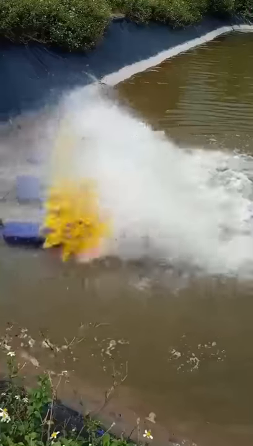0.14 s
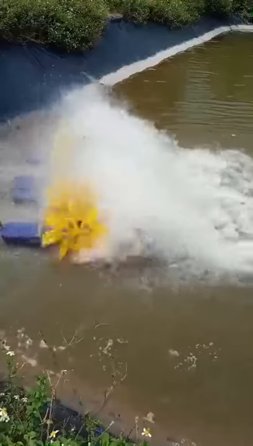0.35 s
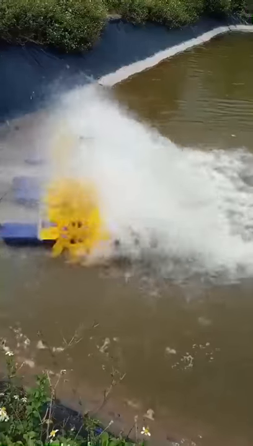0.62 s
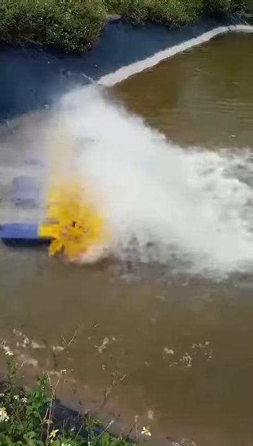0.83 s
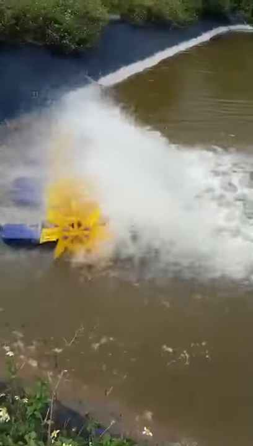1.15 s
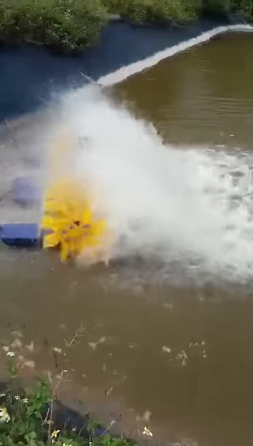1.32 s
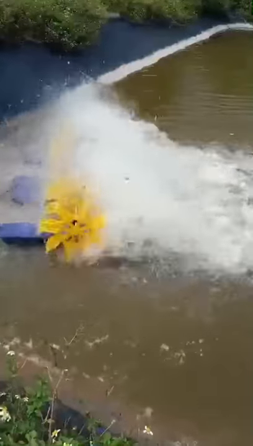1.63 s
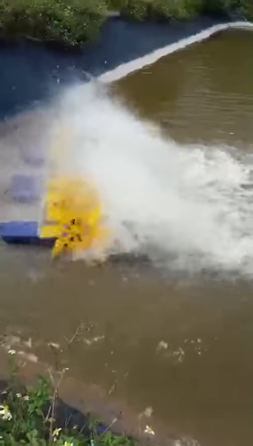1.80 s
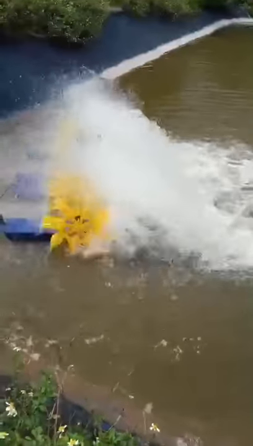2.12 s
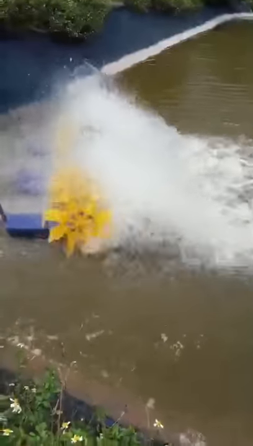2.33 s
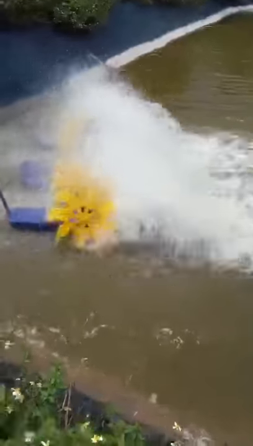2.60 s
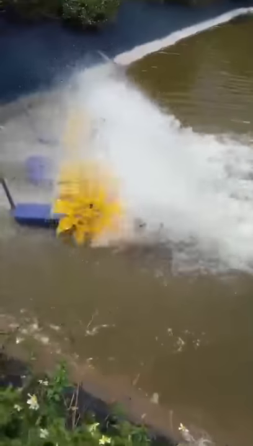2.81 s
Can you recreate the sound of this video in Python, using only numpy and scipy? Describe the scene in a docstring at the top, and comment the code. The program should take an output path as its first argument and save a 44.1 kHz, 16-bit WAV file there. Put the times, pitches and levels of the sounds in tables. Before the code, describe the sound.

Steady splashing and hissing spray from a paddle wheel aerator, its motor humming faintly.

```python
"""Paddle wheel churning a pond

A paddle wheel aerator turns a few metres away, heard in mono and fading in. Its blades slap
the water and drag air under, which booms. Torn sheets of water fall back as a dense rush of
bubbles, heavy lumps land with a plop, and fine spray hisses on top. Beneath the water noise
the motor hums and its gearbox whines."""
import sys
import numpy as np
from scipy import signal
from scipy.fft import rfft, irfft, next_fast_len
from scipy.io import wavfile

SR = 44100
rng = np.random.default_rng(int(sys.argv[2]) if len(sys.argv) > 2 else 0)


def store_pcm(level_fs):
    """Save levels as 16-bit WAV."""
    pcm = np.round(np.clip(level_fs, -1, 1) * 32767).astype(np.int16)
    wavfile.write(sys.argv[1], SR, np.atleast_2d(pcm).T)


N = 130095
TIME = np.arange(N) / SR
CUTOFF_HZ = 10500  # the treble ends here

# The tones of the motor's hum. Each row: pitch in Hz, average level in dB.
HUM_TONES = [(129, -58.5), (169, -59), (318, -54.5), (726.5, -54), (1680, -60)]
# How the gear whine comes and goes. Each row: time in seconds, level in dB against the other rows.
WHINE_CURVE = [(.13, -39.5), (.42, -43.5), (.55, -39.5), (.73, -40.5), (.84, -45.5), (1.1, -41),
               (1.45, -54), (1.65, -38), (1.9, -48), (2.2, -40.5), (2.5, -40.5), (2.7, -42), (2.95, -57)]
# The tone colour of falling spray. Each row: frequency in Hz, relative strength in dB.
SPRAY_SPECTRUM = [(1500, -23), (3300, -3.5), (3650, -2), (4500, -3.5), (5450, -2), (5850, -1), (6400, -1.5),
                  (7200, 2.5), (7650, -0.5), (9300, 2), (9750, -9), (10000, -6.5), (10200, -20),
                  (10500, -30)]
# How the spray swells and sinks. Each row: time in seconds, level change in dB.
SPRAY_CURVE = [(.13, -0.5), (.25, 0.5), (.48, 1.1), (.62, 0), (.7, 0), (.9, .9), (1.3, .5), (1.75, 0.6),
               (1.86, -1.1), (1.95, 0.3), (2.3, 0.5), (2.6, -.5), (2.75, 1.5), (2.95, -0.1)]
# The tone colour of churned water. Each row: frequency in Hz, relative strength in dB.
CHURN_SPECTRUM = [(20, -36), (42, -32), (62, -23.5), (95, -13), (128, -9), (200, -6.6), (380, -7),
                  (530, -6.5), (680, -2), (1000, -3), (1280, -4.5), (1550, -6.5), (1950, 0.5), (2150, -1.5),
                  (2550, -1.5), (2900, -10), (3350, -18.5), (5000, -21.5), (10000, -43)]
# How much water the wheel throws. Each row: time in seconds, change in dB.
THROW_CURVE = [(.13, 0.1), (.4, -0.5), (.62, 0.5), (.84, -0.24), (1.15, 0.06), (1.4, 0.25), (1.54, -0.8),
               (1.68, 0), (1.95, -0.2), (2.2, 0.04), (2.5, 0.25), (2.95, 0.3)]
# How the water's bright roar swells and sinks. Each row: time in seconds, level change in dB.
ROAR_CURVE = [(.15, -1), (.32, 0), (.45, .5), (.68, .5), (.8, -2), (.92, 1), (1.13, 0.3), (1.4, 1.1),
              (1.49, -0.5), (1.68, 1.5), (1.87, -0.9), (2.0, 0.5), (2.12, -0.4), (2.5, 0.1), (2.7, 1.3),
              (2.95, -0.5)]
# How the hiss just above that roar swells and sinks. Each row: time in seconds, level change in dB.
HISS_CURVE = [(.13, 0), (.5, 1), (.74, 0.3), (.9, 0.3), (1.22, 0.7), (1.48, 0), (1.6, 1.3), (1.73, -0.5),
              (1.97, -0.5), (2.05, -3.5), (2.12, 1), (2.2, -1.5), (2.33, 0), (2.55, -.1), (2.8, -0.8),
              (2.95, 1.3)]
# Large air pockets collapsing. Each row: start in seconds, strength in dB, starting pitch in Hz.
AIR_POCKETS = [(0.361, -47, 127), (0.51, -44, 143), (0.747, -31, 136), (0.839, -39, 130.5),
               (0.911, -39, 148), (1.145, -37, 137), (1.286, -46, 159), (1.581, -31.5, 138),
               (1.95, -48, 131), (2.254, -42.5, 137), (2.325, -33.5, 215), (2.525, -35, 169),
               (2.851, -35, 137)]
# Heavy lumps of water landing. Each row: start in seconds, strength in dB, pitch of the hollow in Hz.
WATER_LUMPS = [(0.312, -33, 796), (0.445, -32.5, 925), (0.655, -29, 748), (0.763, -27.5, 747),
               (0.849, -35, 903), (1.235, -30.5, 689), (1.312, -29, 1000), (1.418, -23.5, 656),
               (1.6, -26.5, 800), (1.81, -35, 796), (1.89, -35, 837), (2.212, -33, 782), (2.355, -29, 670),
               (2.432, -31, 960), (2.555, -34, 995), (2.62, -29, 843), (2.682, -25.5, 745),
               (2.758, -34, 816), (2.9, -33, 686)]


def from_db(db):
    """Turn decibels into a number to multiply a sound by."""
    return 10 ** (np.asarray(db) / 20)


def rms_one(x):
    """Scale a signal so that its average size (rms) is 1."""
    return x / np.sqrt(np.mean(x ** 2) + 1e-20)


def follow(curve):
    """Join (time, value) rows with straight lines, giving a value for every sample."""
    return np.interp(TIME, *np.transpose(curve))


def colour(x, spectrum):
    """Give a dense sound the tone colour in a table, at average size 1."""
    size = next_fast_len(N + SR // 10)
    hz = np.arange(size // 2 + 1) * SR / size
    row_hz, row_db = np.transpose(spectrum)
    gain = from_db(np.interp(np.log(np.maximum(hz, 1)), np.log(row_hz), row_db))
    return rms_one(irfft(rfft(x, size) * gain, size)[:N])


def drift(per_s):
    """A smooth random wander of average size 1, turning about per_s times a second."""
    step, warm_up = 40, 2000  # one value every 40 samples; the first 2000 values are skipped
    pole = np.exp(-2 * np.pi * step * per_s / SR)
    noise = rng.standard_normal(N // step + warm_up + 2)
    slow = signal.lfilter([1], [1, -2 * pole, pole * pole], noise)[warm_up:]
    return np.interp(np.arange(N) / step, np.arange(len(slow)), rms_one(slow - slow.mean()))


def ring(x, hz, ring_s):
    """Make a sound ring at one pitch, dying away by 60 dB in ring_s seconds."""
    pole = np.exp(-np.log(1000) / (ring_s * SR))
    angle = 2 * np.pi * hz / SR
    return signal.lfilter([.5, 0, -.5], [1, -2 * pole * np.cos(angle), pole * pole], x + 1e-18)


def clicks(per_s, spread_db):
    """Tiny impacts at random times and of random sizes."""
    sizes = from_db(spread_db * np.minimum(rng.exponential(1, N), 5)) * rng.choice([-1, 1], N)
    return sizes * (rng.random(N) < per_s / SR)


def burst(start, attack_s, decay_s):
    """The loudness of one splash: a quick rise, then a fall."""
    age = np.maximum(TIME - start, 0)
    return (1 - np.exp(-age / attack_s)) * np.exp(-age / decay_s)


def rising_tone(start, hz, rise_per_s):
    """Trapped air rings higher as it nears the surface; rise_per_s is a share of its starting pitch."""
    age = TIME - start
    return np.sin(2 * np.pi * (hz * age * (1 + rise_per_s * age / 2) + rng.random()))


def patchy_noise(flicker_db, per_s, bands_per_octave):
    """Noise split into frequency bands that each flicker on their own."""
    size = next_fast_len(N)
    white = rfft(rng.standard_normal(size))
    hz = np.arange(size // 2 + 1) * SR / size
    band = (bands_per_octave * np.log2(np.clip(hz, 90, CUTOFF_HZ))).astype(int)
    return sum(irfft(white * (band == k), size)[:N] * from_db(flicker_db * drift(per_s))
               for k in np.unique(band))


def swell_band(x, edges_hz, curve):
    """Turn one frequency band of a sound up and down along a curve."""
    band = signal.sosfiltfilt(signal.butter(4, edges_hz, "band", fs=SR, output="sos"), x)
    return x + band * (from_db(follow(curve)) - 1)


def motor(whine_hz=2000, speed_wobble=.0014, flutter_db=2):
    """Hum and gear whine waver in pitch together with the load on the wheel; the whine comes and goes."""
    phase_per_hz = 2 * np.pi * np.cumsum(1 + speed_wobble * drift(5.9)) / SR
    out = 0
    for hz, db in HUM_TONES + [(whine_hz, follow(WHINE_CURVE))]:
        flutter = from_db(flutter_db * drift(10))
        tone = np.sin(hz * phase_per_hz + 2 * np.pi * rng.random())
        out += from_db(db) * rms_one(flutter * tone)
    return out


def spray(surge_db):
    """Fine mist hisses and larger drops tick on the surface."""
    mist = colour(patchy_noise(flicker_db=2, per_s=18.5, bands_per_octave=12), SPRAY_SPECTRUM)
    drops = colour(clicks(per_s=2500, spread_db=-0.5), SPRAY_SPECTRUM)
    swell = from_db(1.15 * surge_db + follow(SPRAY_CURVE))
    return (from_db(-38.5) * mist + from_db(-40.5) * drops) * swell


def gulps():
    """Large air pockets boom briefly as they collapse, rising in pitch as they surface."""
    return sum(from_db(db) * burst(start, attack_s=0.0049, decay_s=0.027)
               * rising_tone(start, hz, rise_per_s=1) for start, db, hz in AIR_POCKETS)


def lumps(splash_width_hz=190, plop_share=0.51):
    """Heavy lumps of water land with a short hollow splash and a rising plop."""
    ring_s = np.log(1000) / (np.pi * splash_width_hz)
    out = 0
    for start, db, hz in WATER_LUMPS:
        splash = rms_one(ring(rng.standard_normal(N), hz, ring_s))
        plop = rms_one(rising_tone(start, hz, rise_per_s=2.4))
        landing = np.sqrt(1 - plop_share) * splash + np.sqrt(plop_share) * plop
        out += from_db(db) * burst(start, attack_s=0.0025, decay_s=0.014) * landing
    return out


def blades(per_s=10.6, jitter_s=0.0191, spread_db=3.7):
    """Each blade slaps the uneven surface and drags down a pocket of air that booms."""
    strokes = 0
    for k, (late, size) in enumerate(rng.standard_normal((40, 2))):
        start = k / per_s + jitter_s * late
        strokes += from_db(spread_db * size) * burst(start, attack_s=0.0025, decay_s=0.038)
    slap = colour(strokes * rng.standard_normal(N), CHURN_SPECTRUM)
    boom = ring(strokes * rng.standard_normal(N), hz=136, ring_s=0.097)
    return from_db(-44) * slap + from_db(-58) * colour(boom, CHURN_SPECTRUM)


def bubbles(surge_db, ring_cycles=44):
    """Each trapped bubble rings briefly at a pitch set by its size; more water makes more bubbles."""
    pitches_hz = np.geomspace(380, 3200, 96)
    births = clicks(per_s=2800 * from_db(surge_db), spread_db=1.3)
    pitch_choice = rng.integers(0, len(pitches_hz), N)
    rings = sum(ring(births * (pitch_choice == k), hz, ring_cycles / hz) * hz
                for k, hz in enumerate(pitches_hz))
    return from_db(-35) * colour(rings, CHURN_SPECTRUM)


def churn(surge_db):
    """Torn sheets of water fall back on the pond with a dense rush."""
    rush = patchy_noise(flicker_db=1.36, per_s=40, bands_per_octave=5)
    return from_db(-31 + surge_db) * colour(rush, CHURN_SPECTRUM)


def scene():
    """Mix water and motor; the amount of water thrown drives the rush, bubbles and spray."""
    surge_db = follow(THROW_CURVE) + 0.43 * drift(41)
    water = churn(surge_db) + bubbles(surge_db) + spray(surge_db) + blades()
    water = swell_band(water, (1700, 2900), ROAR_CURVE)
    water = swell_band(water, (2920, 5500), HISS_CURVE)
    pond = water + lumps() + gulps() + motor()
    return np.array([pond, pond])


def record(dry):
    """After a moment of silence the sound fades in; the highest treble is cut away."""
    start_s, open_s, fade_s = 0.12, 0.0073, 0.3
    age = TIME - start_s
    opening = np.clip(age / open_s, 0, 1)  # avoids a click
    fade = opening * np.clip(0.04 + age / fade_s, 0, 1)
    treble_cut = signal.ellip(12, .1, 90, CUTOFF_HZ, fs=SR, output="sos")
    return signal.sosfilt(treble_cut, dry * fade)


dry = scene()
out = record(dry)
store_pcm(out)
```